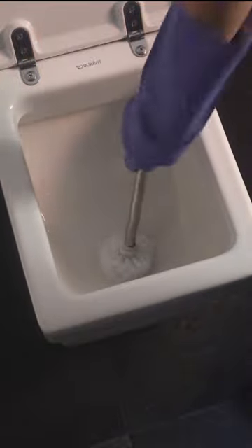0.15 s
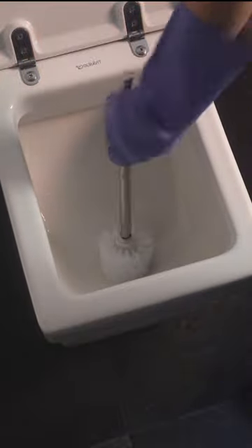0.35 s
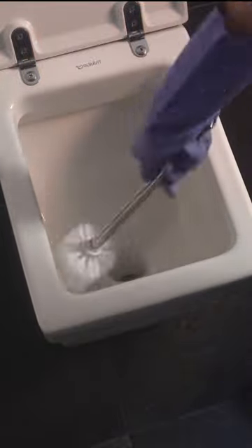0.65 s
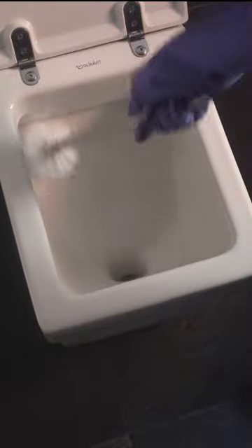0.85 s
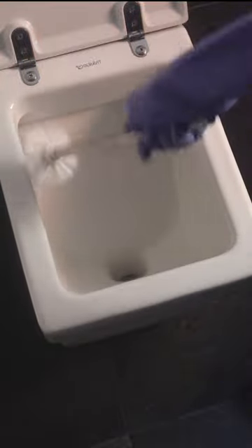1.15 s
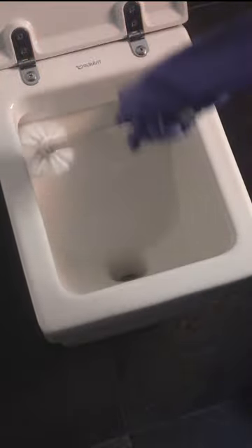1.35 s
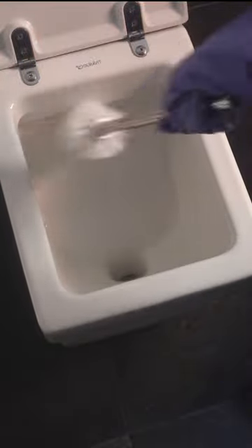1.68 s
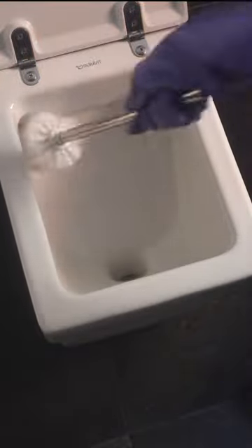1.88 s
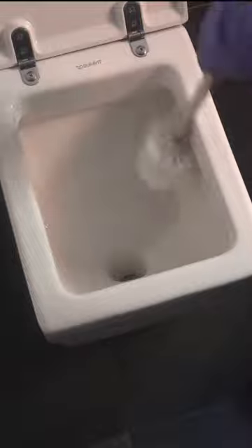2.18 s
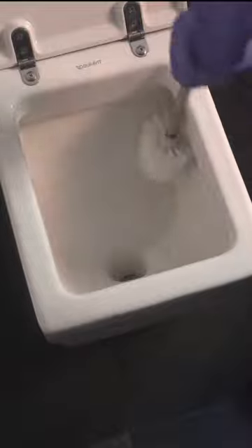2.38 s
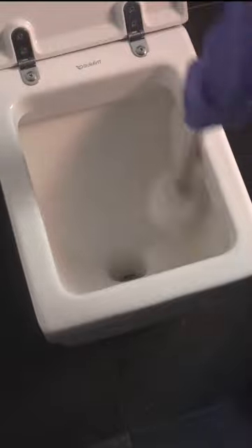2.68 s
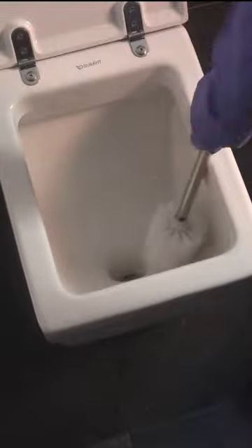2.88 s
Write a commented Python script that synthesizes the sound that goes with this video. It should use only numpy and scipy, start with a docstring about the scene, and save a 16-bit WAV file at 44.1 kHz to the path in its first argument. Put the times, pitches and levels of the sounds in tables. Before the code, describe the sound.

Toilet brush scrubbing a ceramic bowl in uneven hissing strokes, with hollow bumps and handle knocks

```python
"""Toilet brush in a ceramic bowl

A brush scrubs a bowl in a small tiled bathroom, first down in the drain, then round the walls.
Each stroke is a hiss of countless bristle slips; dragged tufts rasp, bent tufts snap free as short pitched bursts.
The brush head bumps the hollow bowl: boom, hollow tone, dull knock.
From about midway the loose steel handle knocks and rings as decaying sines; later its joint clacks and rattles."""
import sys
import numpy as np
from scipy import signal
from scipy.fft import rfft, irfft, next_fast_len
from scipy.io import wavfile
from scipy.ndimage import uniform_filter1d

SR = 44100
rng = np.random.default_rng(int(sys.argv[2]) if len(sys.argv) > 2 else 0)


def file_out(sig):
    """Save sig as 16-bit WAV at sys.argv[1]."""
    # one column per channel
    cols = np.atleast_2d(sig).T
    # limit, then scale
    lim = np.clip(cols, -1, 1)
    pcm = np.round(lim * 32767).astype(np.int16)
    wavfile.write(sys.argv[1], SR, pcm)


N = 133623
T = np.arange(N) / SR
IN_DRAIN_S = 0.65  # the brush leaves the drain here

# spectrum of the bristle hiss: hz, level_db (per Hz)
BRISTLE_SPECTRUM = [(100, -31.5), (300, -16), (550, -16.5), (950, -31), (1500, -24.5), (2300, -13.5),
                    (3300, -6), (4300, -3), (5300, 0.5), (6600, 2.5), (9000, 3.5), (12000, 2), (16000, -4)]


def from_db(db):
    """Decibels to gain."""
    return 10 ** (np.asarray(db) / 20)


def rms_one(x):
    """Scale to unit rms."""
    return x / np.sqrt(np.mean(x ** 2) + 1e-20)


def low_pass(x, hz):
    """Dull the treble above hz."""
    return signal.sosfilt(signal.butter(2, min(hz, SR / 2 - 1), fs=SR, output="sos"), x)


def colour(x, points):
    """Filter by a (hz, gain_db) curve, interpolated over log frequency."""
    hz, db = np.transpose(points)
    size = next_fast_len(N + 8192)
    f = np.maximum(np.fft.rfftfreq(size, 1 / SR), 1)
    gain = from_db(np.interp(np.log(f), np.log(hz), db))
    return irfft(rfft(x, size) * gain, size)[:N]


def resonate(x, hz, width_hz):
    """A resonance applied twice for steep skirts; rms 1."""
    r = np.exp(-np.pi * width_hz * np.pi / 2 / SR)  # pi / 2 offsets the narrowing by the second pass
    b = [1 - r, 0, r - 1]
    a = [1, -2 * r * np.cos(2 * np.pi * hz / SR), r * r]
    once = signal.lfilter(b, a, x)
    return rms_one(signal.lfilter(b, a, once))


def shaken(hz, width_hz):
    """A resonance kept going by random contacts, its level evened out."""
    x = resonate(rng.standard_normal(N), hz, width_hz)
    power = uniform_filter1d(x * x, int(SR / max(width_hz, 5)))
    return x / np.sqrt(np.abs(power) + .02)


def wavering(hz, width_hz):
    """A single mode whose phase wanders as the brush keeps nudging it; rms 1."""
    wander = np.cumsum(rng.standard_normal(N)) * np.sqrt(2 * np.pi * width_hz / SR)
    return np.sqrt(2) * np.sin(2 * np.pi * hz * T + low_pass(wander, 2 * width_hz))


def drift(hz):
    """Random movement slower than hz; rms 1."""
    noise = rng.standard_normal(N + SR // 2)
    return rms_one(low_pass(noise, hz)[SR // 2:])  # drop the filter's settling


def swell(peak_s, rise_s, fall_s):
    """A rounded rise to a peak, then a more pointed fall."""
    fall_shape = 1.38
    rise = ((peak_s - T) / rise_s) ** 2
    fall = (np.abs(T - peak_s) / fall_s) ** fall_shape
    return np.exp(-np.where(T < peak_s, rise, fall))


def struck(start_s, decay_s):
    """A sudden start and an exponential decay."""
    return (T >= start_s) * np.exp(-np.clip((T - start_s) / decay_s, 0, 40))


def echoes(x, t60_s):
    """Dense reflections that die away; unit energy."""
    t = T[:SR // 2]
    tail = rng.standard_normal(len(t)) * from_db(-60 * t / t60_s) * (t > .001)
    return signal.fftconvolve(x, tail / np.linalg.norm(tail))[:N]


def still_room():
    """Steady coloured noise of the room, as mid and side."""
    # hz, level_db (per Hz)
    mid_spectrum = [(25, -64), (80, 0), (160, -8), (400, -3.5), (1000, -8.5), (4000, -12.5), (16000, -39)]
    # left minus right: hz, level_db (per Hz)
    side_spectrum = [(40, -32), (150, -2), (500, 9), (1100, 1), (1700, -11), (2500, -41)]
    mid_db, side_db = -61.5, -69.5
    mid = from_db(mid_db) * rms_one(colour(rng.standard_normal(N), mid_spectrum))
    side = from_db(side_db) * rms_one(colour(rng.standard_normal(N), side_spectrum))
    return mid, side


def slips():
    """Tiny clicks of uneven size as single bristles slip, coming in clumps."""
    slips_per_s, size_spread_db = 26000, 2.27
    chatter_db, chatter_hz = .5, 70
    sizes_db = size_spread_db * np.minimum(rng.exponential(1, N), 5)
    sizes = from_db(sizes_db) * rng.choice([-1, 1], N)
    happens = rng.random(N) < slips_per_s / SR
    return sizes * happens * from_db(chatter_db * drift(chatter_hz))


def flicks():
    """Gain of the hiss: each small tuft that lets go lifts it at once, then it sinks back."""
    flicks_per_s, lift, decay_s = 56, 0.35, 0.0037
    kicks = (rng.random(N) < flicks_per_s / SR) * np.minimum(rng.exponential(1, N), 2)
    lifts = signal.lfilter([1], [1, -np.exp(-1 / (decay_s * SR))], kicks)
    return rms_one(1 + lift * lifts)


def shifting(x, count=18):
    """Each narrow range of pitch swells and sinks on its own as other tufts take the load."""
    patchy_db, patch_hz = 2.03, 15
    size = next_fast_len(N)
    spectrum, f = rfft(x, size), np.fft.rfftfreq(size, 1 / SR)
    centres_hz = np.geomspace(1200, 15000, count)
    out = 0
    for share in np.eye(count):  # overlapping triangular bands
        band = irfft(spectrum * np.interp(f, centres_hz, share), size)[:N]
        out = out + band * from_db(patchy_db * drift(patch_hz))
    return out


def bristles():
    """Strokes drive the hiss, each with its own brightness; the drain resonates while the brush is in it."""
    # strokes: peak_s, rise_s, fall_s, level_db, brightness_db (treble against the rest)
    strokes = [(.01, 0.041, 0.037, -29.5, 2), (.175, 0.046, 0.04, -28, 2.5),
               (0.281, 0.028, 0.051, -29.5, 5), (.45, 0.063, 0.076, -28, 4), (.515, 0.045, 0.063, -29.5, 1),
               (0.608, 0.0025, 0.26, -32, 2), (.78, 0.066, 0.028, -32.5, -1), (.82, .012, 0.13, -26.5, 1.5),
               (1.016, 0.017, 0.11, -28.5, 1), (1.16, 0.028, 0.12, -35, 2),
               (1.205, 0.015, 0.1, -27.5, -2.5), (1.3, 0.048, 0.18, -32.5, 6.5),
               (1.43, 0.045, 0.2, -33, -1), (1.527, .006, 0.026, -29.5, 4), (1.6, .01, 0.017, -39, 9),
               (1.665, 0.052, 0.059, -36, 7), (1.785, 0.033, 0.087, -33, 7.5),
               (2.05, 0.044, 0.062, -35, -4.5), (2.179, 0.034, 0.049, -26, -9),
               (2.3, 0.061, 0.091, -32.5, -12), (2.413, 0.021, 0.071, -22, -3),
               (2.515, 0.028, 0.033, -32, -8), (2.59, 0.017, 0.078, -25.5, -9),
               (2.67, 0.045, 0.022, -29, -11), (2.728, 0.012, 0.13, -28.5, -11.5),
               (2.835, 0.01, 0.018, -25, 2), (2.894, 0.038, 0.066, -29, -4.5),
               (2.951, 0.0094, 0.0086, -29, -5), (3.0, 0.0068, 0.041, -28.5, -1)]
    # light rubbing between strokes: time_s, level_db
    contact = [(0, -34.5), (.55, -42), (.95, -35), (1.5, -44), (1.85, -32), (2.0, -43.5), (2.12, -62),
               (2.3, -37), (3.03, -35)]
    # drain resonances, changing as the brush sinks: pitch_hz, width_hz, level_db, strongest_s
    drain_modes = [(513, 130, -25.5, 0.023), (1610, 83, -33, 0.4), (2480, 620, -13.5, 0.5),
                   (2550, 870, -17, .01), (3335, 240, -12.5, 0.25)]
    bright_pivot_hz, drain_span_s = 7700, 0.33

    dull = bright = from_db(np.interp(T, *np.transpose(contact))) ** 2  # powers
    for peak_s, rise_s, fall_s, db, bright_db in strokes:
        power = (from_db(db) * swell(peak_s, rise_s, fall_s)) ** 2
        dull = dull + power / from_db(bright_db)
        bright = bright + power * from_db(bright_db)

    hiss = rms_one(shifting(colour(slips() * flicks(), BRISTLE_SPECTRUM)))
    low = signal.sosfiltfilt(signal.butter(2, bright_pivot_hz, fs=SR, output="sos"), hiss)
    drain = 0
    for hz, width_hz, db, strongest_s in drain_modes:
        span = swell(strongest_s, drain_span_s, drain_span_s)
        drain = drain + from_db(db) * span * resonate(slips(), hz, width_hz)
    return np.sqrt(dull) * (low + drain * (T < IN_DRAIN_S)) + np.sqrt(bright) * (hiss - low)


def rasps():
    """Tufts drag on the glaze, slipping in a narrow range of pitch, fading as they straighten."""
    # start_s, length_s, pitch_hz, width_hz, level_db
    drags = [(0.133, 0.4, 6930, 350, -44), (1.017, 0.045, 6530, 695, -31.5),
             (1.21, 0.076, 5340, 700, -37.5), (1.38, 0.23, 4700, 250, -57), (1.482, 0.072, 4500, 120, -45),
             (1.027, 0.074, 2270, 1220, -49.5), (1.19, 0.07, 1510, 1300, -53),
             (1.323, 0.027, 1720, 900, -49), (2.133, 0.032, 7300, 2500, -29), (2.13, 0.16, 1740, 1250, -42),
             (2.161, 0.072, 5750, 300, -31), (2.265, 0.039, 4850, 400, -38), (2.38, 0.11, 5750, 510, -31.5),
             (2.499, 0.044, 4660, 450, -32.5), (2.58, .06, 5200, 700, -31), (2.651, 0.037, 4330, 120, -35),
             (2.57, 0.19, 1090, 600, -51.5)]
    edge_s = 0.012
    out = 0
    for start_s, length_s, hz, width_hz, db in drags:
        drag = np.clip((T - start_s) / edge_s, 0, 1) * np.exp(-((T - start_s) / length_s) ** 2)
        out = out + from_db(db) * drag * resonate(rng.standard_normal(N), hz, width_hz)
    return out


def snaps():
    """A bent tuft lets go: a few milliseconds of packed clicks around one pitch, with a broad crack."""
    # start_s, level_db, pitch_hz, decay_s, crack_db (relative)
    releases = [(0.606, -23, 8700, 0.0032, -3.5), (.778, -28, 6300, 0.0058, -4),
                (0.9046, -27, 5500, 0.009, -15), (1.008, -28, 6350, 0.0084, -15),
                (1.203, -26, 5100, 0.002, 4), (1.2054, -19, 5730, 0.0043, -4),
                (1.3163, -31, 9500, 0.0075, 6.5), (1.5248, -31.5, 6020, .007, 4),
                (2.0068, -18, 6240, .0018, -7), (2.3273, -22.5, 5360, 0.0056, -1),
                (2.4075, -15, 5880, 0.0022, 0), (2.51, -23.5, 5040, 0.0034, -4),
                (2.566, -23.5, 6800, 0.013, -20), (2.585, -27, 8900, 0.0085, 5),
                (2.592, -13.5, 5130, 0.0037, -13), (2.708, -23, 6400, 0.015, -15),
                (2.726, -27.5, 8800, 0.0046, 3), (2.733, -13, 5050, .0015, -10),
                (2.7893, -23.5, 6500, .003, 3.5), (2.899, -22, 5100, 0.0027, -9)]
    width_hz = 1440
    clicks = rng.choice([-1., 1.], N)
    crack = rms_one(colour(rng.choice([-1., 1.], N), BRISTLE_SPECTRUM))
    out = 0
    for start_s, db, hz, decay_s, crack_db in releases:
        burst = resonate(clicks, hz, width_hz) + from_db(crack_db) * crack
        out = out + from_db(db) * struck(start_s, decay_s) * burst
    return out


def bowl():
    """Each bump of the brush head wakes a deep boom, the hollow tone of the bowl and a dull knock."""
    # start_s, length_s, boom_db, hollow_db, knock_db
    bumps = [(0.613, 0.1, -52.5, -57, -51), (0.816, .1, -57.5, -62, -53.5), (1.202, 0.062, -48.5, -58, -45),
             (1.31, 0.15, -57.5, -63, -50), (1.532, 0.087, -51, -54.5, -50),
             (1.813, 0.067, -62, -59.5, -53), (2.036, 0.033, -61, -53.5, -46), (2.19, 0.15, -59, -53, -49),
             (2.394, 0.13, -48, -41, -49.5), (2.565, .13, -48, -42, -42), (2.712, 0.072, -57, -37.5, -52),
             (2.84, 0.054, -50, -46, -50.5), (2.923, 0.11, -52.5, -81, -81)]
    # broad part of the knock: hz, level_db (per Hz)
    knock_spectrum = [(40, -36), (70, 6), (120, 4), (190, -8.5), (320, -1.5), (400, 8), (500, 4.5),
                      (620, -1.5), (800, -5.5), (1200, -3), (1650, -4.5), (2400, -44.5), (5000, -14)]
    # hollow resonances in the knock: pitch_hz, width_hz, level_db
    knock_peaks = [(350.4, 33, -14.5), (501.5, 30, -11), (592.5, 108, -8.5), (906, 130, -18.5),
                   (1606, 136, -10)]
    knock_rise_s, knock_broad_db = 0.0061, -3.5
    hollow_share = 0.4  # rise and fall of the hollow tone, as a share of the bump length

    boom = wavering(83.5, width_hz=12.8)
    hollow = shaken(258.2, width_hz=14.2)
    clicks = slips()
    knock = from_db(knock_broad_db) * rms_one(colour(clicks, knock_spectrum))
    for hz, width_hz, db in knock_peaks:
        knock = knock + from_db(db) * resonate(clicks, hz, width_hz)

    out = 0
    for start_s, length_s, boom_db, hollow_db, knock_db in bumps:
        half_s, hollow_s = length_s / 2, length_s * hollow_share
        out = out + swell(start_s + knock_rise_s, knock_rise_s, length_s) * from_db(knock_db) * knock
        out = out + swell(start_s + half_s, half_s, half_s) * from_db(boom_db) * boom
        out = out + swell(start_s + half_s, hollow_s, hollow_s) * from_db(hollow_db) * hollow
    return out


def handle():
    """The steel tube is knocked and rings in decaying modes until the grip stops it."""
    # start_s, level_db, free_s (ringing time before the grip damps it)
    knocks = [(1.386, -44, 0.076), (1.485, -39.5, 0.047), (2.0047, -35, 0.11), (2.204, -24.5, 0.026),
              (2.245, -36.5, 0.07), (2.381, -39, 0.058), (2.428, -35.5, 0.086), (2.567, -28, 0.054),
              (2.71, -31.5, 0.032), (2.777, -43, 0.019), (2.83, -38.5, 0.039)]
    # main mode: pitch_hz, level_db, t60_s
    main_mode = (3074, 0, .65)
    # weaker modes: pitch_hz, level_db, t60_s
    weak_modes = [(2970, -12, 0.89), (2970, -22, 0.36), (4500, -16.5, 0.36), (5370, -13, 0.17),
                  (7600, -16, 0.2)]
    grip_stop_s, buzz_depth, buzz_hz = .004, .2, 70
    out = np.zeros(N)
    for start_s, db, free_s in knocks:
        start = int(start_s * SR)
        t = T[:min(SR // 4, N - start)]
        grip = np.exp(-np.maximum(t - free_s, 0) / grip_stop_s)
        for hz, mode_db, t60_s in [main_mode] + weak_modes:
            level_db = db + mode_db + rng.normal(0, 1)  # no two knocks alike
            ring = from_db(level_db - 60 * t / t60_s) * np.sin(2 * np.pi * hz * t)
            out[start:start + len(t)] += grip * ring
    return out * (1 + buzz_depth * drift(buzz_hz))


def joint():
    """The loose joint of the handle clacks, rings and rattles on, with a lower clunk from the brush head."""
    # start_s, level_db, decay_s, clunk_db (relative)
    clacks = [(2.0062, -30, 0.08, -2.5), (2.139, -45, 0.076, -29), (2.204, -39.5, 0.23, -25),
              (2.405, -42, 0.063, -5.5), (2.442, -37, 0.039, 2), (2.584, -46, 0.24, 9),
              (2.723, -63, 0.13, 16)]
    # rattle: pitch_hz, width_hz, level_db
    rattle_modes = [(1450, 330, -11.5), (1574, 57, -10), (1658, 80, -14)]
    # clunk: pitch_hz, width_hz, level_db
    clunk_modes = [(259, 23, -16), (507.5, 45, -12.5)]
    # ring after every clack: pitch_hz, level_db, t60_s
    ring_modes = [(413, -11.5, 0.51), (499, -7.5, 0.52), (541, -11.5, 0.9), (1424, -20, .2), (1510, -6, .2),
                  (1584, -7.5, .2), (1708, -2.5, .2)]
    ring_db = -5.5

    rattle = sum(from_db(db) * shaken(hz, width_hz) for hz, width_hz, db in rattle_modes)
    clunk = sum(from_db(db) * shaken(hz, width_hz) for hz, width_hz, db in clunk_modes)
    t = T[:SR // 4]
    ring = 0
    for k, (hz, db, t60_s) in enumerate(ring_modes):
        mode = from_db(ring_db + db - 60 * t / t60_s) * np.sin(2 * np.pi * hz * t)
        ring = ring + mode * (-1) ** k  # alternate polarity

    out, hits = 0, np.zeros(N)
    for start_s, db, decay_s, clunk_db in clacks:
        out = out + from_db(db) * struck(start_s, decay_s) * (rattle + from_db(clunk_db) * clunk)
        hits[int(start_s * SR)] = from_db(db)
    return out + signal.fftconvolve(hits, ring)[:N]


def scene():
    """Brush sounds echo in bowl and tiled room; nearly mono, with more side treble once out of the drain."""
    # side level of the treble hiss: hz, side_minus_mid_db
    treble_side = [(7000, -62), (9000, -37), (10500, -14), (12500, -9), (16000, -4.5)]
    # side level of the echoes: hz, gain_db
    echo_side = [(60, -40), (150, -49), (300, -31), (600, -21.5), (1500, -36), (2200, -62), (3000, -47.5),
                 (4500, -72)]
    bowl_t60_s, bowl_echo_db, bowl_top_hz = 0.066, -10.5, 7560
    room_t60_s, room_db, room_top_hz = 0.35, -9.5, 5400
    side_t60_s, drain_side_db = 0.6, -6

    brush = bristles() + snaps() + rasps()
    bowl_echo = from_db(bowl_echo_db) * low_pass(echoes(brush, bowl_t60_s), bowl_top_hz)
    near = brush + bowl_echo + handle() + joint() + bowl()
    room_echo = from_db(room_db) * low_pass(echoes(near, room_t60_s), room_top_hz)
    floor_mid, floor_side = still_room()
    mid = near + room_echo + floor_mid

    # the side takes independent draws of hiss and snaps
    hiss_side = colour(bristles() + snaps(), treble_side) * from_db(drain_side_db * (T < IN_DRAIN_S))
    side = hiss_side + colour(echoes(near, side_t60_s), echo_side) + floor_side
    return np.array([mid + side, mid - side])


def record(dry):
    """The microphone drops the deepest bass; the top is cut steeply."""
    low_cut_hz, top_cut_hz = 19, 16200
    thinned = signal.sosfilt(signal.butter(2, low_cut_hz, "high", fs=SR, output="sos"), dry)
    return signal.sosfilt(signal.ellip(12, .1, 80, top_cut_hz, fs=SR, output="sos"), thinned)


dry = scene()
out = record(dry)
file_out(out)
```